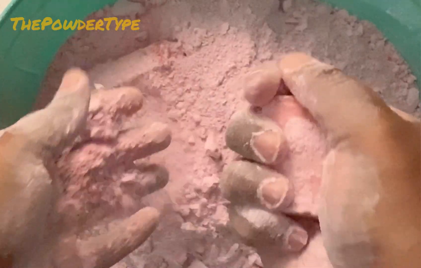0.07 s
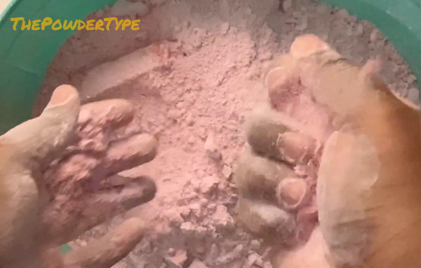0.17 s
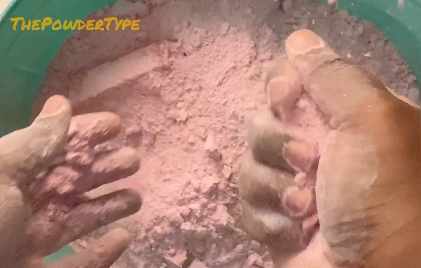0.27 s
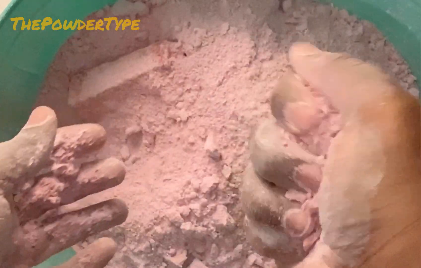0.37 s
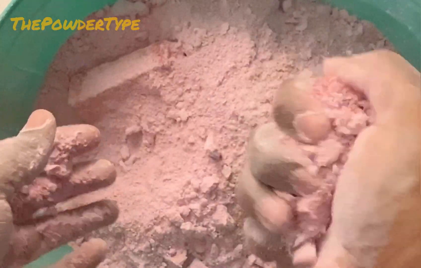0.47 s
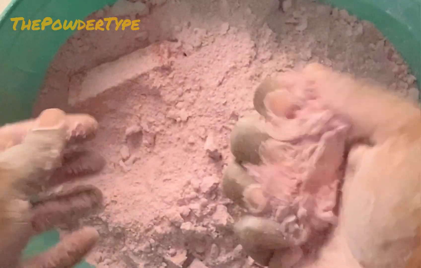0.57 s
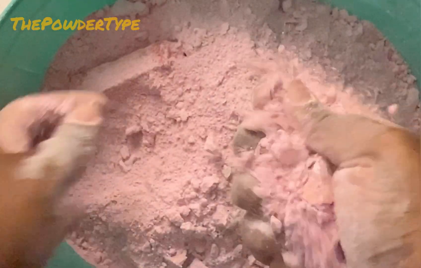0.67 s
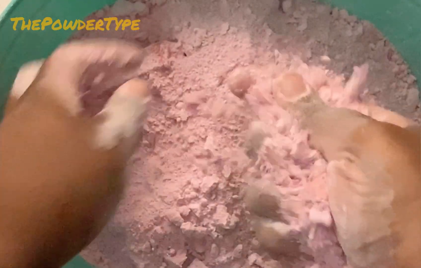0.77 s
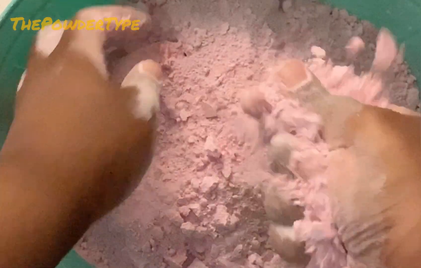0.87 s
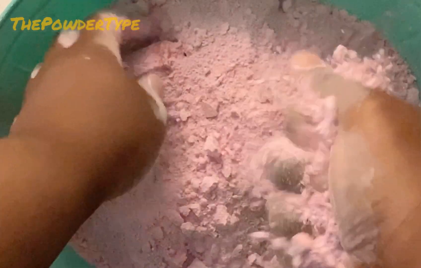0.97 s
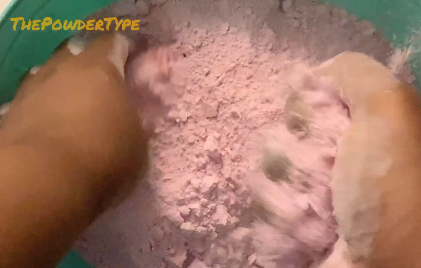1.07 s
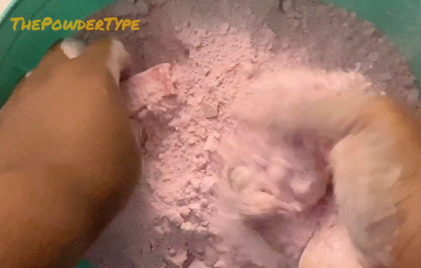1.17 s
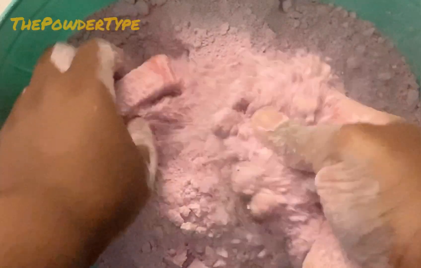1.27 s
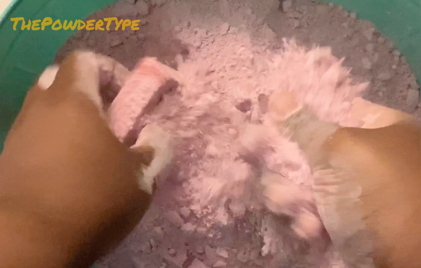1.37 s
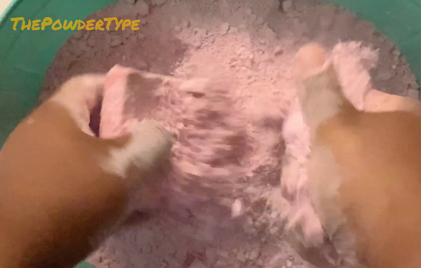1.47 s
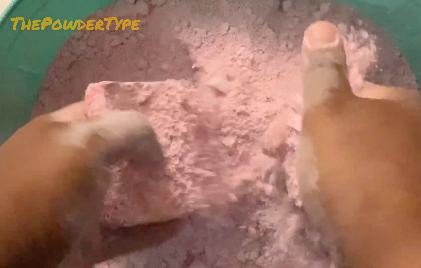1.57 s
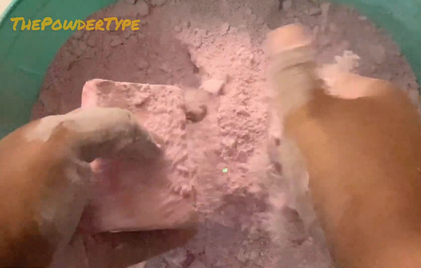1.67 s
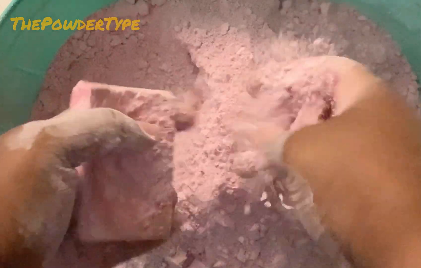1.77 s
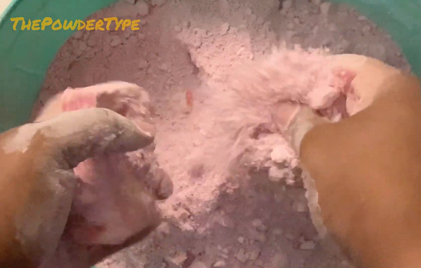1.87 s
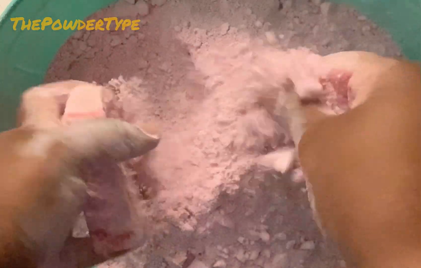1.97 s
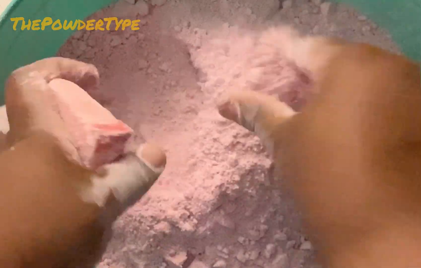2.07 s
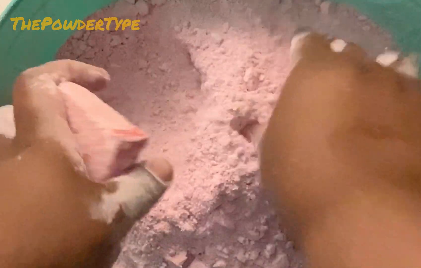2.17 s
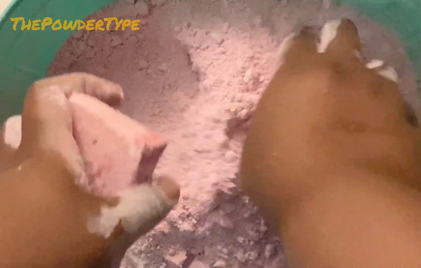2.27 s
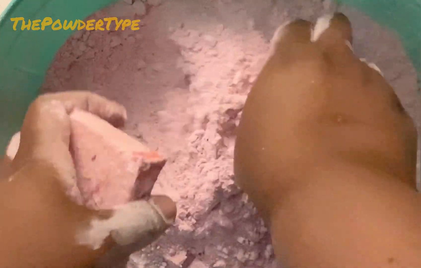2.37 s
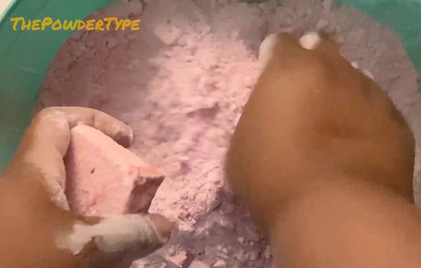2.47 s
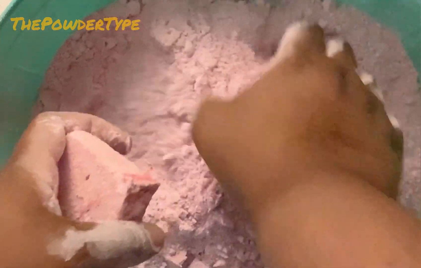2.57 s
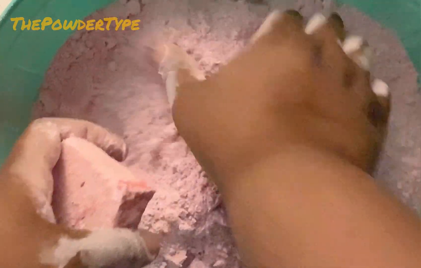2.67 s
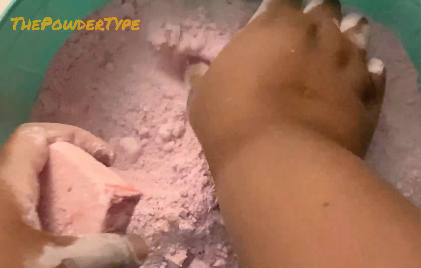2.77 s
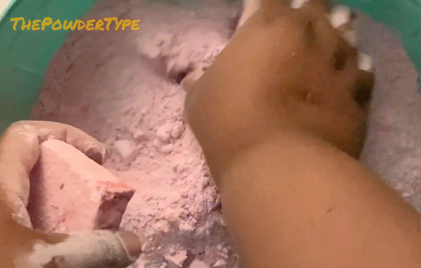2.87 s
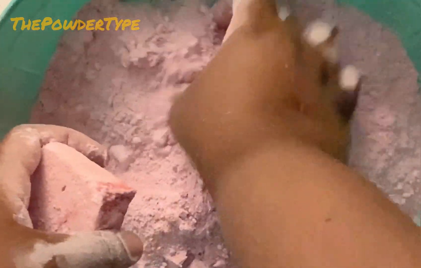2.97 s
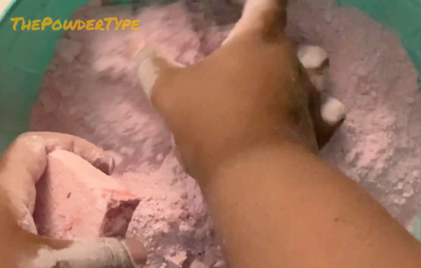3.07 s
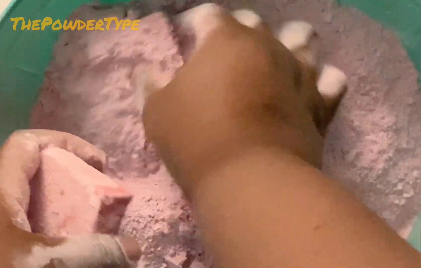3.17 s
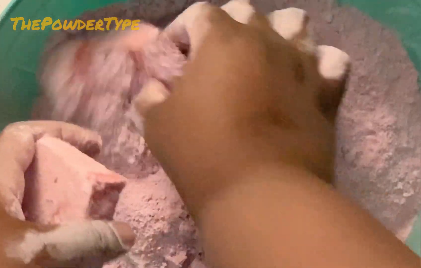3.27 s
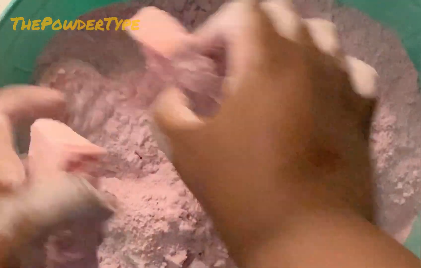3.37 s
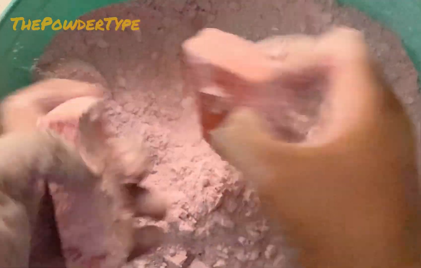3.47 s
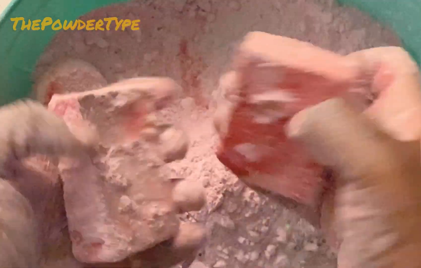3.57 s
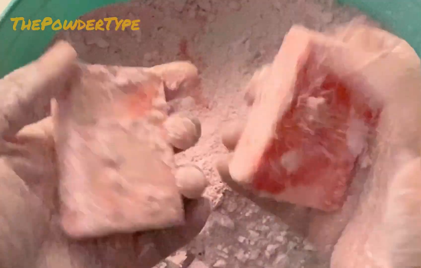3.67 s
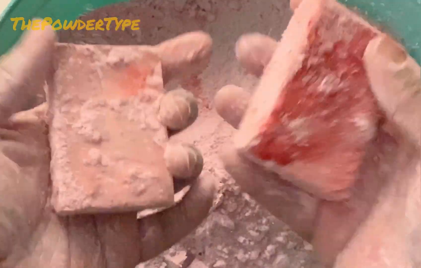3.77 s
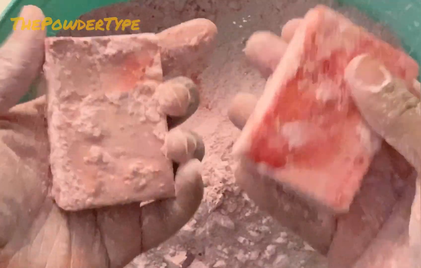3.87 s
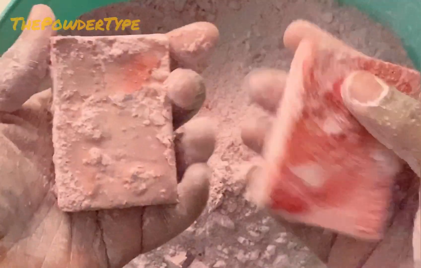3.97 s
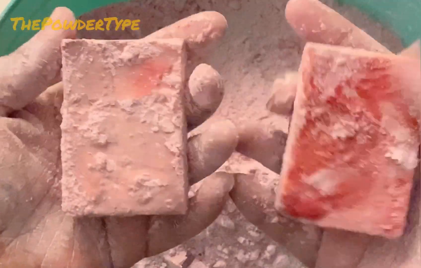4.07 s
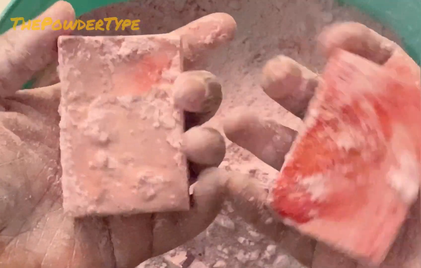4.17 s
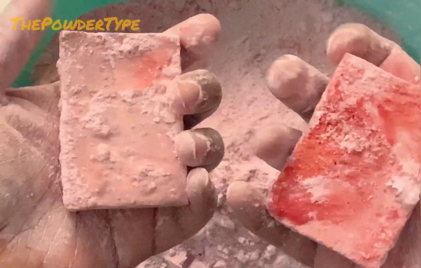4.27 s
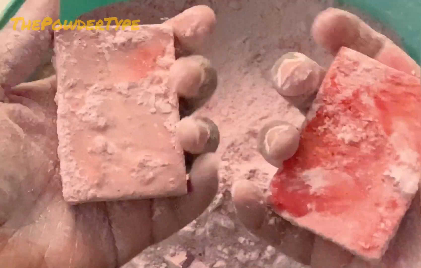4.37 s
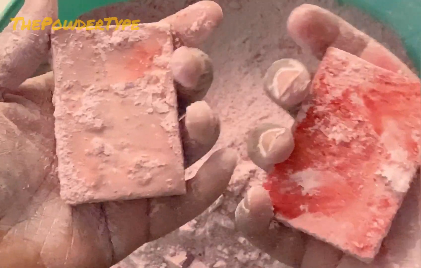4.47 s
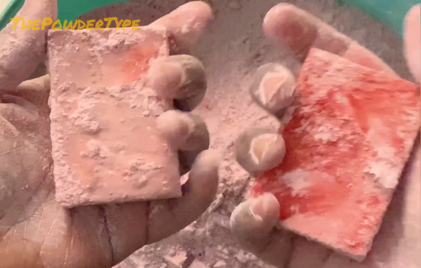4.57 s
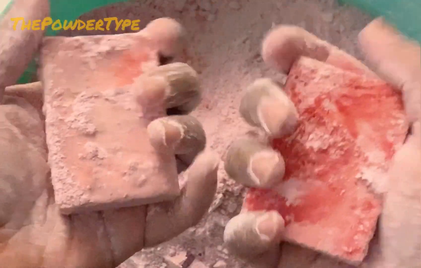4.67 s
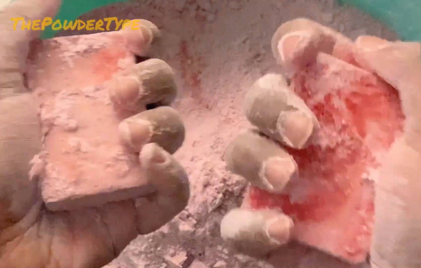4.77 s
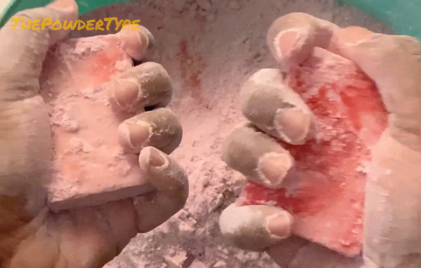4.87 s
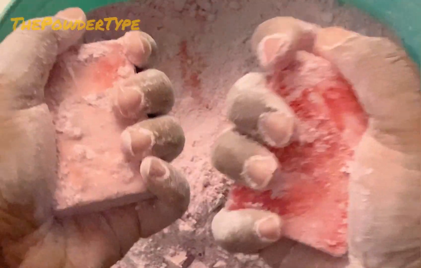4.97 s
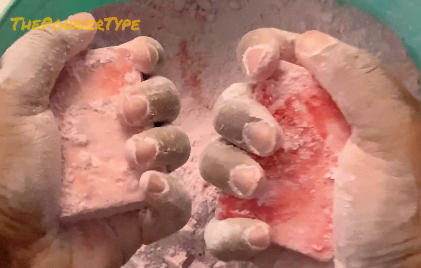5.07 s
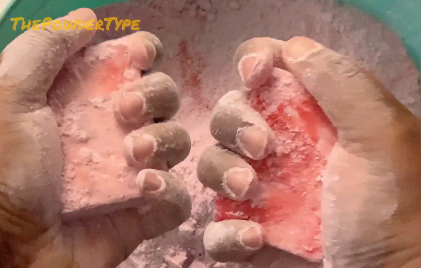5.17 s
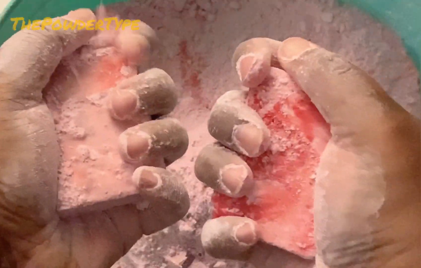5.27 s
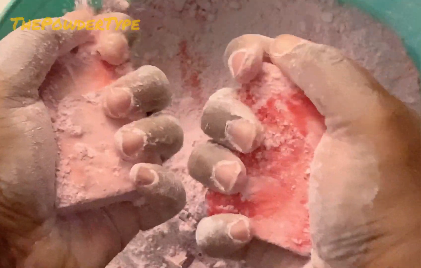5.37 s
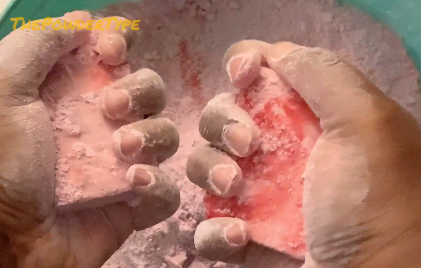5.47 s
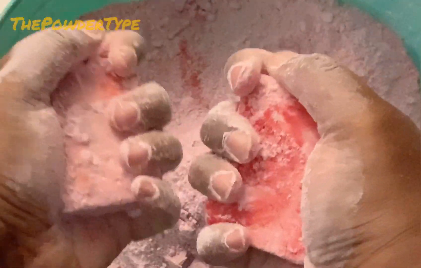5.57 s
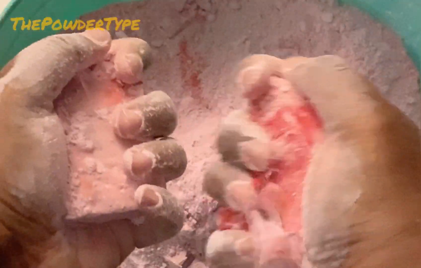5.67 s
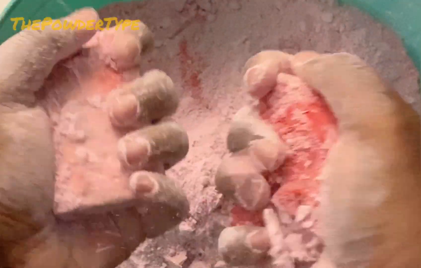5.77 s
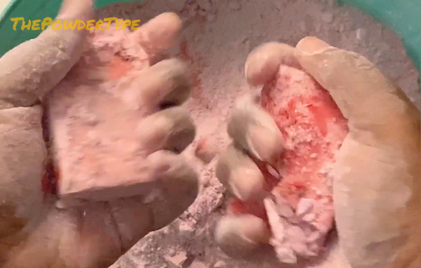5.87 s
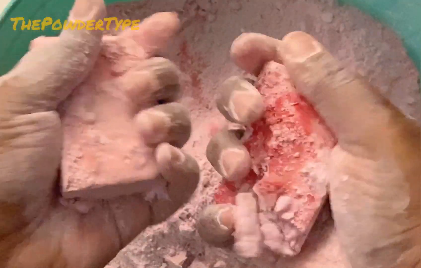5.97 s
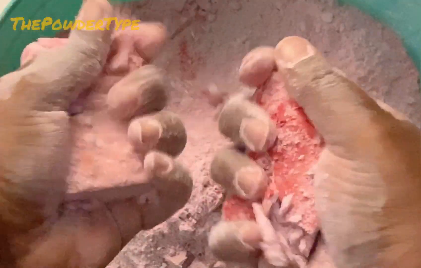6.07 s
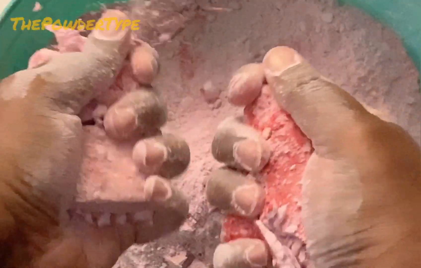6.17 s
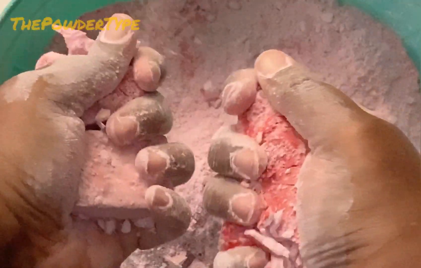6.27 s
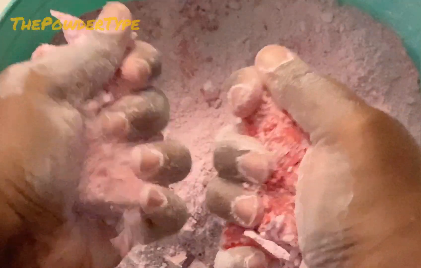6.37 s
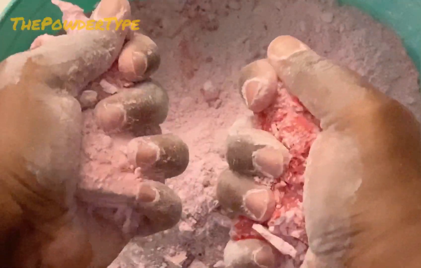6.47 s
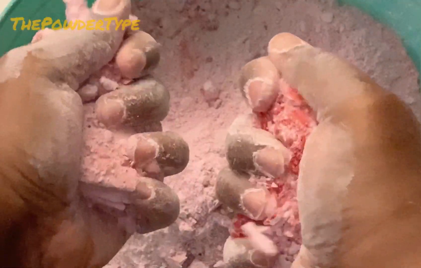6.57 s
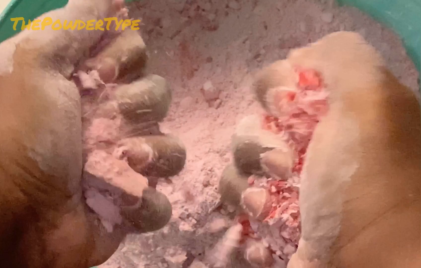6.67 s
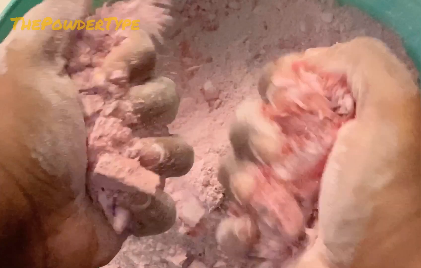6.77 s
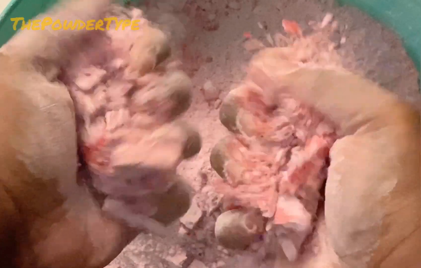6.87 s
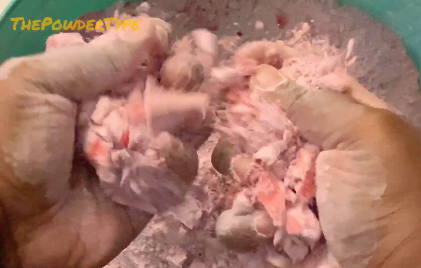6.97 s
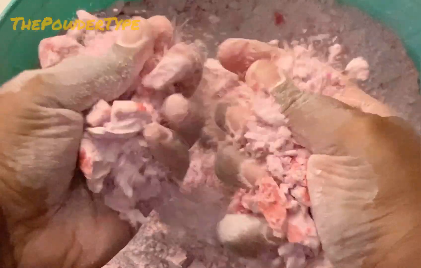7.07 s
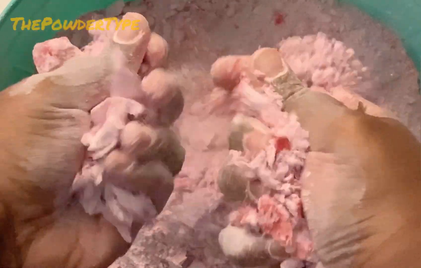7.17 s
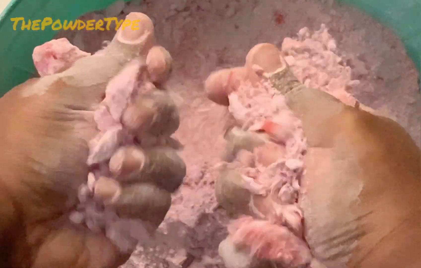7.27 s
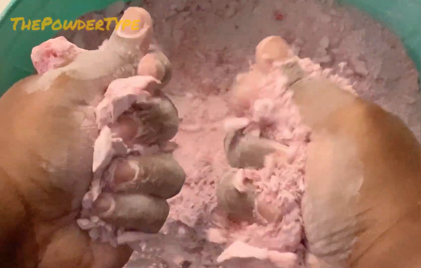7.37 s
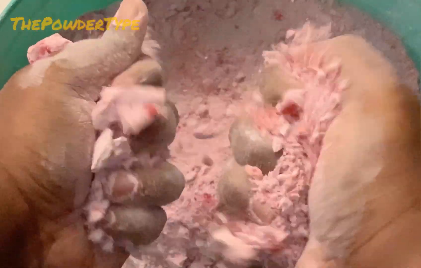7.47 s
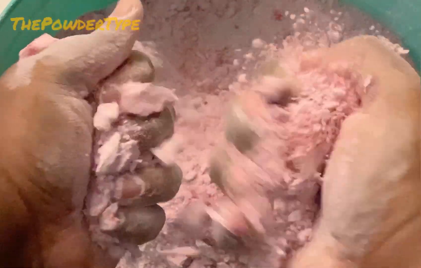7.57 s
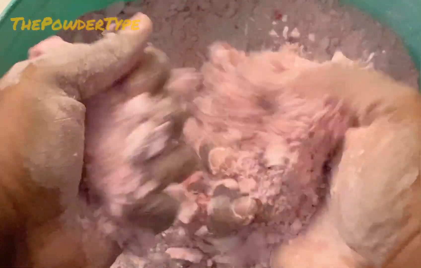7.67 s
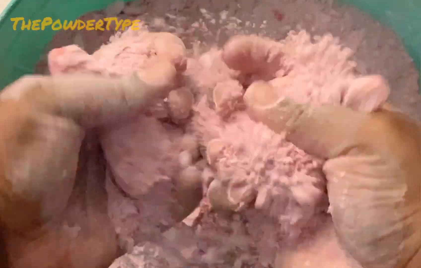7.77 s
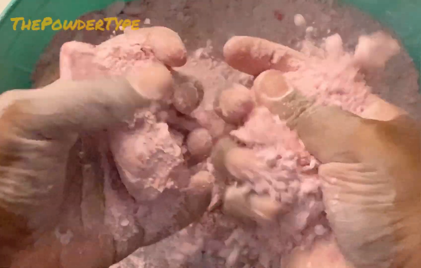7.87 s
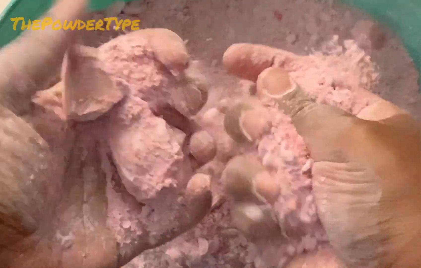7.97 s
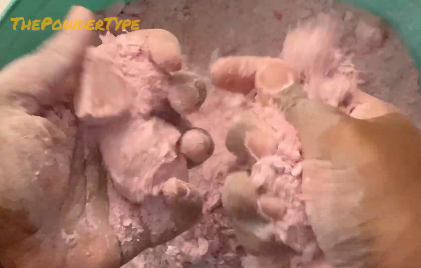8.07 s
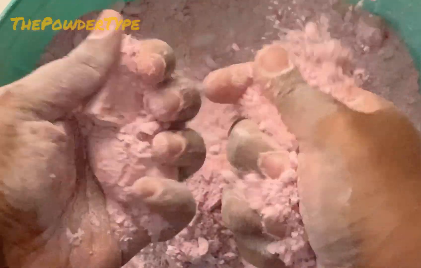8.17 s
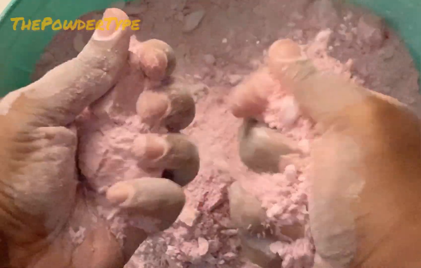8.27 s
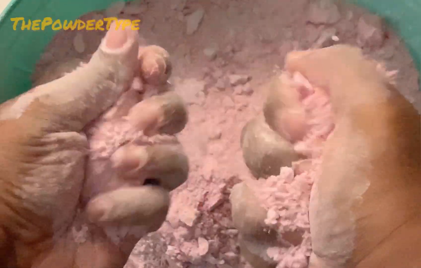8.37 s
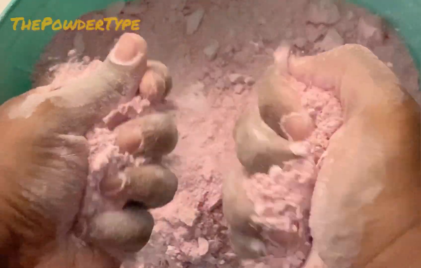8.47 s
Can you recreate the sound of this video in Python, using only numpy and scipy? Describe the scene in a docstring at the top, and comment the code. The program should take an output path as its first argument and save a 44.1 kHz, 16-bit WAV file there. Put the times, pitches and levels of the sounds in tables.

```python
"""In a room with a faint machine rumble and hum, two hands squeeze soft chalk over a plastic bowl of powder, close up.
Blocks snap as short kicks through damped resonances, with splinters, grit and a dull echo from the bowl.
Random grains filtered by colour make the grinding crumbs and dust, the spills and the streaming powder.
A hand digs with a muffled rumble; dry fingers slide over blocks with a grainy hiss and a wandering tone."""
import sys
import numpy as np
from scipy import signal
from scipy.fft import rfft, irfft, next_fast_len
from scipy.io import wavfile

SR = 44100
rng = np.random.default_rng(int(sys.argv[2]) if len(sys.argv) > 2 else 0)


def dump(signal):
    """Clip the signal to [-1, 1] and save it as 16-bit WAV at the path in sys.argv[1]."""
    limited = np.clip(np.atleast_2d(signal).T, -1, 1)
    pcm = np.round(limited * 32767).astype(np.int16)
    wavfile.write(sys.argv[1], SR, pcm)


N = 375280
TIME = np.arange(N) / SR


def from_db(db):
    """Decibels to gain."""
    return 10 ** (np.asarray(db) / 20)


def rms_one(x):
    """Scale to unit power."""
    return x / np.sqrt(np.mean(x ** 2) + 1e-20)


def gains(rows):
    """Each dB column of a curve as a gain per sample, practically silent outside its span."""
    s, *columns = np.transpose(rows)
    return np.array([from_db(np.interp(TIME, s, c, left=-120, right=-120)) for c in columns])


def around(s, reach_s):
    """The samples within reach of a moment."""
    return slice(max(int((s - reach_s) * SR), 0), int((s + reach_s) * SR))


def drift(rate_hz):
    """Smooth chance of unit power: noise through a two-pole low-pass."""
    step = 40  # samples between the slow values
    pole = np.exp(-2 * np.pi * step * rate_hz / SR)
    noise = rng.standard_normal(N // step + 2002)
    slow = signal.lfilter([1], [1, -2 * pole, pole * pole], noise)[2000:]
    return np.interp(np.arange(N) / step, np.arange(len(slow)), rms_one(slow))


def coloured(x, colour):
    """Causal (minimum-phase) filter with the given magnitude curve; unit power."""
    size = 2 * next_fast_len(N // 2 + SR // 10)
    hz, db = np.transpose(colour)
    log_hz = np.log(np.arange(size // 2 + 1) * SR / size + 1)
    curve_db = np.interp(log_hz, np.log(hz), db)
    # folding the cepstrum onto positive time makes the filter causal
    cepstrum = irfft(np.log(from_db(curve_db)))
    cepstrum[1:size // 2] *= 2
    cepstrum[size // 2 + 1:] = 0
    response = np.exp(rfft(cepstrum))
    return rms_one(irfft(rfft(x, size) * response, size)[:N])


def resonance(x, hz, q):
    """Band-pass of quality q, gain 1 on top."""
    w = 2 * np.pi * min(hz, SR / 2 - 1) / SR
    a = np.sin(w) / (2 * q)
    return signal.lfilter([a, 0, -a], [1 + a, -2 * np.cos(w), 1 - a], x + 1e-18)


def soften(x, hz):
    """Steep low-pass: soft chalk carries little above hz."""
    return signal.sosfilt(signal.butter(4, min(hz, .45 * SR), fs=SR, output="sos"), x)


def add(track, s, sound):
    """Mix a sound into the track at time s."""
    i = max(int(s * SR), 0)
    track[i:i + len(sound)] += sound[:max(N - i, 0)]


def grains(per_s, spread_db, low_hz, high_hz, q, wash=1.0, count=10):
    """Random fractures, many small and few large, ring briefly; noise stands for the countless finest."""
    sizes = from_db(spread_db * np.minimum(rng.exponential(1, N), 4)) * rng.choice([-1, 1], N)
    fractures = rms_one(sizes * (rng.random(N) < per_s / SR))
    clicks = fractures + wash * rng.standard_normal(N)
    # each sample is dealt to one of the resonances
    dealt = rng.integers(0, count, N)
    pitches = np.geomspace(low_hz, high_hz, count)
    return rms_one(sum(resonance(clicks * (dealt == k), hz, q) for k, hz in enumerate(pitches)))


# the clearest breaks, levels before trims:
# [t/s, level/dB, piece f/Hz, splinters re the snap/dB, bright grit/dB]
CLEAR_BREAKS = [(0.021, -44.5, 2180, -13, -49.5), (0.0745, -47.5, 2390, -8, -57),
                (0.102, -22.5, 618, -5, -50), (0.102, -30, 2610, -2, -43.5),
                (0.2475, -35, 1446, -1.5, -43.5), (0.3192, -40.5, 1600, -7, -50.5),
                (0.33, -35.5, 2930, -0.5, -35.5), (0.3321, -32.5, 2000, 5, -41.5),
                (0.3353, -30, 1215, 1.5, -44.5), (0.3428, -47.5, 2200, -8, -47.5),
                (0.3667, -38, 2105, 7.5, -39), (0.3821, -34.5, 1040, 1, -49.5),
                (0.6108, -45.5, 2200, -5.5, -57.5), (0.8255, -50, 1900, -8.5, -52),
                (0.8713, -41.5, 4030, -15.5, -40), (0.887, -35, 1590, -19.5, -59.5),
                (0.9395, -9, 1000, -2.5, -35), (0.9419, -24, 2390, -20, -61.5), (0.958, -41, 1280, 10, -29),
                (0.9672, -42, 1700, -11.5, -52.5), (1.0198, -31, 2420, -20.5, -40.5),
                (1.039, -30, 1660, 8, -44.5), (1.0412, -36.5, 2280, 14, -42.5),
                (1.062, -37.5, 2200, -3.5, -39.5), (1.0755, -40, 2510, -15, -44),
                (1.1263, -43.5, 2400, -4.5, -47), (1.154, -34.5, 2440, 3, -36),
                (1.174, -48.5, 1340, -12, -42), (1.2066, -34, 1336, 3, -36.5),
                (1.2172, -32, 857, -21, -36.5), (1.232, -28, 2540, -4, -30),
                (1.2746, -59.5, 1500, -12, -37.5), (1.2913, -48, 2200, -6, -55.5),
                (1.337, -38, 1820, 2.5, -63.5), (1.3818, -31, 1750, 2, -52), (1.498, -39, 1540, -4.5, -40),
                (1.56, -40.5, 2890, -14.5, -43.5), (1.5635, -43, 2660, -14, -41),
                (1.593, -40, 1430, -9, -54.5), (1.6033, -46.5, 2200, -9.5, -49.5),
                (1.6968, -45, 2370, 4, -45), (1.8353, -35, 1590, -12.5, -67.5),
                (2.0572, -28.5, 1892, 4, -41.5), (2.0729, -39.5, 1820, -4.5, -65),
                (2.1357, -48.5, 2600, -13.5, -54), (2.1727, -33.5, 980, 8, -64),
                (2.2054, -33.5, 2480, -17.5, -55), (2.241, -38.5, 2400, -12, -56),
                (2.2678, -37.5, 704, -7.5, -64.5), (2.303, -38.5, 630, 9, -70.5),
                (2.385, -28, 545, -7, -71), (2.446, -37.5, 2670, -22, -51.5),
                (2.488, -28.5, 806, -7.5, -68), (2.5364, -35, 1860, 5, -68),
                (2.5677, -36, 1236, 7.5, -76.5), (2.622, -37.5, 1870, -20, -73.5),
                (2.6386, -42.5, 1750, -2.5, -75), (2.6996, -48.5, 3200, -12.5, -47),
                (2.7332, -24, 1653, -2.5, -64), (2.733, -27.5, 3940, -15, -46.5),
                (2.7881, -44, 2000, -8, -55.5), (2.8969, -31.5, 2110, -8, -55),
                (2.8993, -26.5, 900, -3, -68), (2.9293, -41, 1800, -9, -62), (2.9773, -46, 2200, -7, -57),
                (3.0133, -44, 1710, -11, -65.5), (3.0906, -30, 818, -4, -71),
                (3.166, -50, 1150, -7.5, -47.5), (3.1742, -35.5, 710, 5.5, -57.5),
                (3.221, -36.5, 850, -7.5, -61.5), (3.2589, -43, 1340, 10.5, -59.5),
                (3.286, -44.5, 2300, -10, -59.5), (3.3079, -37, 1700, 3, -59),
                (3.3239, -34.5, 1600, 7, -64.5), (3.354, -42, 1830, -5.5, -56),
                (3.565, -55, 4120, -7, -57.5), (3.5718, -55, 1600, -3.5, -61),
                (3.5786, -54.5, 3360, -9.5, -57.5), (3.9588, -52.5, 1260, 8.5, -84),
                (4.0258, -53.5, 2170, -5, -66), (4.1324, -52.5, 2590, -8, -66),
                (5.0402, -50.5, 716, -17.5, -51.5), (5.09, -62, 897, -5, -73.5),
                (5.263, -52, 2235, -3, -58.5), (5.298, -50.5, 873, -4, -61.5), (5.3736, -49, 1370, -3, -48),
                (5.3871, -24, 1383, 3, -43.5), (5.3924, -35.5, 1580, 1.5, -50),
                (5.43, -48.5, 2000, -1, -46.5), (5.4321, -37.5, 1970, 9, -41),
                (5.444, -29, 1420, -6.5, -50.5), (5.4465, -23, 1000, -14.5, -53.5),
                (5.4522, -34.5, 1750, 10, -43), (5.4659, -39, 1460, 5, -48.5),
                (5.4701, -29, 1776, -1, -47.5), (5.651, -37.5, 835, 10.5, -48.5),
                (5.7742, -46, 800, -12.5, -75), (5.8092, -56, 3800, -8, -53), (5.8309, -49, 3200, -21, -37),
                (5.8441, -38.5, 1900, 6.5, -40), (5.963, -55, 2180, -3.5, -47),
                (6.0422, -44, 1190, -6, -67), (6.0503, -37.5, 812, -1.5, -66),
                (6.0554, -38.5, 1010, 12, -53), (6.097, -44.5, 1053, -6, -59.5),
                (6.1942, -46, 980, -4.5, -70), (6.218, -45, 1990, -16.5, -50.5),
                (6.228, -38.5, 816, -4.5, -64), (6.235, -37, 1414, 9.5, -40),
                (6.282, -37, 1430, -4.5, -49.5), (6.2887, -49, 3200, -5.5, -52),
                (6.308, -46.5, 1190, -9.5, -49.5), (6.342, -32.5, 736, -6, -69),
                (6.3501, -28.5, 902, 8.5, -36), (6.488, -7.5, 983, -17.5, -40),
                (6.493, -40, 2500, -26.5, -71.5), (6.5164, -22, 930, -23, -80),
                (6.6205, -31.5, 895, 7, -55), (6.6245, -15.5, 695, 2.5, -41),
                (6.6297, -22.5, 702, 2, -54.5), (6.6343, -23, 524, -26, -52), (6.675, -34.5, 520, 3, -66),
                (6.709, -38.5, 540, -7, -75), (6.7608, -31, 1870, 8, -46), (6.7683, -27, 2260, -5.5, -51),
                (6.7763, -31, 1400, 14.5, -40), (6.7928, -19.5, 1416, -14.5, -52),
                (6.795, -16, 1030, -16.5, -48.5), (6.8055, -17.5, 1750, 1.5, -39.5),
                (6.8223, -16, 1960, -7, -35), (6.8245, -23, 913, -22.5, -60.5), (6.867, -43, 2500, -7, -46),
                (6.877, -41.5, 1590, 10.5, -51.5), (6.8926, -41, 1510, 2, -43.5),
                (6.9088, -44, 1700, -6.5, -58.5), (6.9237, -44.5, 2470, -9, -53),
                (6.939, -51, 2600, -10, -49.5), (6.9942, -47, 1950, -7, -52), (7.0017, -47, 2000, -8, -57),
                (7.013, -43.5, 2600, -3, -48), (7.0572, -32, 1797, 4, -46), (7.0651, -42, 2510, -10, -52.5),
                (7.1072, -52, 2600, -10, -46.5), (7.0747, -39.5, 1900, -11, -52.5),
                (7.0869, -48, 1850, 15.5, -39.5), (7.1199, -40, 1260, -11.5, -48.5),
                (7.148, -31, 920, -3.5, -57), (7.1521, -30.5, 1766, -6, -47.5),
                (7.1656, -42, 2720, -10.5, -45), (7.168, -29.5, 575, -2, -54.5),
                (7.2461, -33.5, 750, -9, -50), (7.2582, -30.5, 890, -1.5, -59.5),
                (7.278, -46, 2000, -7.5, -56), (7.284, -43, 1050, -8.5, -59), (7.3033, -33, 760, 0.5, -60),
                (7.3199, -40.5, 2300, -3, -49.5), (7.3592, -48.5, 2200, -11.5, -57),
                (7.4056, -45, 1040, -1, -65.5), (7.4531, -42.5, 2210, -13, -53),
                (7.492, -39, 1670, 13, -35.5), (7.505, -33, 1173, 10.5, -62.5),
                (7.5268, -44.5, 2000, -10.5, -47.5), (7.5697, -39.5, 1750, -3.5, -44.5),
                (7.627, -33.5, 1187, 13, -43.5), (7.6398, -34, 1750, 6.5, -45),
                (7.6502, -36.5, 1610, -4.5, -46.5), (7.6861, -50, 2110, -9.5, -48),
                (7.7359, -38, 986, -7, -47), (7.7597, -30.5, 2530, 5.5, -35),
                (7.7648, -28.5, 621, -2.5, -55.5), (7.77, -31.5, 960, 10, -44),
                (7.8487, -40.5, 1310, -12, -60), (7.8687, -46, 2100, -11, -53), (7.8833, -35, 1750, 0, -49),
                (7.9139, -42, 1740, -5.5, -57.5), (7.937, -39.5, 2570, -12.5, -42),
                (7.9628, -37.5, 1400, -9.5, -42.5), (7.9702, -22.5, 1670, 11.5, -36.5),
                (7.9917, -10, 761, -6.5, -35.5), (7.998, -24, 2450, -27.5, -62),
                (8.0751, -30, 2710, -12, -35.5), (8.095, -41.5, 1670, -14, -48),
                (8.1272, -49.5, 2400, -9, -51), (8.163, -46, 1620, -9.5, -50.5),
                (8.206, -18.5, 1243, -1, -30.5), (8.2143, -32.5, 2020, -8.5, -54),
                (8.229, -27, 774, 4, -37.5), (8.254, -35.5, 2110, -6, -48.5), (8.289, -37, 500, 17, -61),
                (8.3183, -31.5, 810, 5.5, -52), (8.351, -35.5, 1003, 3, -53.5),
                (8.376, -32.5, 830, -3, -56), (8.4119, -39.5, 1020, -15.5, -71),
                (8.4302, -34, 973, -20, -56.5), (8.437, -38.5, 940, -10.5, -58),
                (8.4423, -52.5, 3170, -14, -41), (8.484, -43.5, 1094, -7, -39)]


def snaps(cracks):
    """A crack kicks a heavily damped piece; splinters and grit follow, and the bowl throws back a dull echo."""
    q = 0.987
    lead_s, echo_s, echo_db = .0006, 0.0015, -12
    body, grit = np.zeros(N), np.zeros(N)
    t = TIME[:SR // 20]
    impulse = 1.0 * (t == 0)
    attack = .003 * SR  # levels hold as if the energy filled 3 ms
    crumbling_s = 0.0019
    swell = t / crumbling_s * np.exp(1 - t / crumbling_s)
    for s, level_db, hz, after_db, bright_db in cracks:
        chips, sand = rng.standard_normal((2, len(t)))
        # three resonances in a row delay the full swing; high pieces ring for more cycles
        piece_q = q * (hz / 1000) ** 0.068
        kick = resonance(resonance(resonance(impulse, hz, piece_q), hz, piece_q), hz, piece_q)
        # a higher mode stands out in small cracks and grows less than the kick in big ones
        upper_hz = hz * 1.528
        upper = resonance(resonance(resonance(impulse, upper_hz, q), upper_hz, q), 2700, q)
        upper_db = -23.5 + 0.764 * level_db
        # the fracture itself is one abrupt, broad jolt
        edge = resonance(impulse, hz, 0.7)
        # a few splinters follow within milliseconds
        splinters = resonance(chips * np.abs(chips) * swell ** 2, hz, 0.7)
        splinters = resonance(splinters, hz * 0.4415, 0.7)
        parts = [(kick, level_db), (edge, level_db - 10), (upper, upper_db),
                 (splinters, level_db + after_db - 6.0)]
        mixed = sum(from_db(db) * part * np.sqrt(attack / np.sum(part ** 2)) for part, db in parts)
        # small cracks run faster and keep a crisper edge
        crack = soften(mixed, 1500 + 1.37 * hz - 45 * level_db)
        add(body, s - lead_s, crack)
        echo = from_db(echo_db) * resonance(crack, 1700, 0.778)
        add(body, s - lead_s + echo_s * rng.uniform(1.0, 1.22), echo)
        # grit: one tick, a dense burst and a thin tail
        spray = sand * (1.6 * np.exp(-t / 0.00057) + 0.13 * np.exp(-t / 0.0074))
        add(grit, s, from_db(bright_db + 5.5) * (4.0 * impulse + spray))
    grit = signal.sosfilt(signal.butter(2, 12000, fs=SR, output="sos"), grit)
    return body + 1.01 * resonance(grit, 5500, 1.0)


# spells of small pieces cracking: [start t/s, end t/s, rate/(1/s), level over the crumbs/dB, middle f/Hz]
CRACKLING_SPELLS = [(0.948, 1.65, 24.4, -7.5, 1700), (2.098, 3.365, 12.4, -8, 1700),
                    (5.414, 6.157, 12.5, -2, 1800), (6.842, 7.96, 34, -1, 1890),
                    (8.202, 8.506, 40.7, 0, 2030)]


def lesser_cracks(crumb_gain, dust_gain):
    """Small pieces give way at random, more often and louder under more effort; rows as in CLEAR_BREAKS."""
    grit_over_dust_db, splinters_db = 1.5, -31
    scatter_db, scatter_octaves = 0.5, 0.757  # each way
    rows = []
    chances = rng.random((len(CRACKLING_SPELLS), 200, 4))
    for (start_s, end_s, per_s, over_db, hz), draws in zip(CRACKLING_SPELLS, chances):
        # equal shares of the work done are equally likely to bring a crack
        work = np.cumsum(crumb_gain * (TIME > start_s) * (TIME < end_s))
        for when, *chance in draws[:int(per_s * (end_s - start_s))]:
            i = np.searchsorted(work, when * work[-1])
            size, pitch, grit = 2 * np.array(chance) - 1
            level_db = 20 * np.log10(crumb_gain[i]) + over_db + scatter_db * size
            bright_db = 20 * np.log10(dust_gain[i]) + grit_over_dust_db + scatter_db * grit
            rows.append((i / SR, level_db, hz * 2 ** (scatter_octaves * pitch), splinters_db, bright_db))
    return rows


# thin, high pings just after the hardest breaks: [t/s, level before the note levels/dB]
HARD_BREAK_PINGS = [(0.9436, -46.5), (6.49, -62.5), (7.9973, -42.5)]
# notes of a ping: [f/Hz, relative level/dB, decay/s]
PING_NOTES = [(3002, 28.5, 0.0019), (4920, 4, .008)]


def pings():
    """A thin, high ping of decaying sines just after the hardest breaks; its highest note lingers briefly."""
    out, t = np.zeros(N), TIME[:SR // 10]
    ring = sum(from_db(db) * np.sin(2 * np.pi * hz * t) * np.exp(-t / decay_s)
               for hz, db, decay_s in PING_NOTES)
    for s, level_db in HARD_BREAK_PINGS:
        add(out, s, from_db(level_db) * ring * (1 - np.exp(-t / .0003)))
    return out


# pockets of chalk collapsing at once: [middle t/s, level/dB, half length/s, bright grit/dB]
COLLAPSES = [(0.1058, -27.5, 0.00287, -40.5), (3.233, -49, 0.017, -66.5), (3.315, -45, 0.0053, -72),
             (3.341, -45, 0.0143, -63.5), (5.649, -35.5, 0.00576, -52), (5.858, -72.5, 0.012, -51.5),
             (6.058, -30, 0.00533, -44.5), (6.353, -31, 0.0019, -30.5), (6.634, -39, 0.0168, -50.5),
             (6.67, -71.5, 0.0133, -73), (6.785, -33.5, 0.0038, -44), (8.227, -30.5, 0.005, -54),
             (8.322, -42, 0.0062, -58.5), (8.373, -40, .006, -59.5), (8.482, -37.5, 0.0039, -54.5)]
# tone of the collapse: [f/Hz, relative level/dB]
COLLAPSE_COLOUR = [(150, 5), (500, 5), (1000, 9.5), (1700, 3), (3000, -0.5), (5000, -4.5), (9000, -24)]
# tone of the dust, here and in the grinding: [f/Hz, relative level/dB]
FINE_DUST_COLOUR = [(2500, 0), (5000, 5.5), (7500, -2.5), (10000, 1), (13000, 3.5), (16000, -4)]


def crunches():
    """A collapsing pocket: dense fractures and bright noise swell and die together."""
    coarse = coloured(grains(2500, 4.0, 200, 8000, .5, wash=.3), COLLAPSE_COLOUR)
    bright = coloured(rng.standard_normal(N), FINE_DUST_COLOUR)
    out = np.zeros(N)
    for s, level_db, half_s, bright_db in COLLAPSES:
        near = around(s, 5 * half_s)
        swell = 1 / np.cosh((TIME[near] - s) / half_s) ** 1.52
        out[near] += swell * (from_db(level_db) * coarse[near] + from_db(bright_db) * bright[near])
    return out


# loose pieces rubbing in the first fistful, under the digging hand, in the second fistful;
# each a curve before trims: [t/s, crumbs level/dB, dust level/dB]
RUBBING_PIECES = [
    [(0.0, -58, -75), (0.3, -62.5, -61.5), (0.82, -51.5, -73), (1.07, -46, -51), (1.35, -45.5, -62.5),
     (1.53, -49.5, -53), (1.87, -56.5, -73), (2.06, -56, -59), (2.24, -51, -51.5)],
    [(2.24, -48, -77.5), (2.344, -45.5, -67), (2.396, -43, -76), (2.524, -47, -70.5), (2.784, -48, -67.5),
     (2.956, -49.5, -68), (3.192, -55, -69), (3.33, -59.5, -60), (3.42, -66, -62)],
    [(6.83, -49.5, -57), (6.984, -49.5, -53.5), (7.422, -50, -59), (7.596, -51.5, -57.5), (7.82, -46, -55),
     (8.06, -48.5, -55.5), (8.18, -50.5, -61.5), (8.296, -51, -54.5), (8.38, -49, -62.5), (8.51, -50, -51)],
]
# the fingers tighten and let go: [tightest t/s, half length/s, crumbs level/dB, dust level/dB]
FINGER_SQUEEZES = [(0.01, 0.0444, -46, -60), (0.124, 0.0182, -49, -58), (0.357, 0.0704, -51, -65),
                   (0.596, 0.054, -43.5, -62.5), (0.828, 0.054, -42.5, -61), (0.996, 0.061, -44, -55),
                   (1.131, 0.056, -47.5, -71.5), (1.461, 0.065, -41.5, -60), (1.571, 0.014, -50.5, -52.5),
                   (1.633, 0.021, -49.5, -54), (1.709, 0.0066, -65.5, -52), (1.821, 0.0348, -43, -70),
                   (1.957, 0.0174, -42.5, -53.5), (2.205, .035, -41, -57.5), (2.293, 0.028, -43, -70.5),
                   (2.75, 0.029, -46, -63.5), (2.895, 0.047, -41.5, -62), (3.215, 0.036, -48.5, -61.5),
                   (3.288, .04, -44.5, -76.5), (5.279, 0.0334, -58, -64.5), (5.468, 0.031, -47.5, -60.5),
                   (5.675, .018, -54.5, -67.5), (5.835, 0.031, -58.5, -59), (5.973, .05, -53.5, -61),
                   (6.078, 0.028, -49, -59.5), (6.258, 0.062, -51.5, -65.5), (6.362, 0.0198, -47.5, -59),
                   (6.528, 0.071, -52, -68), (6.642, 0.063, -60, -65), (6.815, .04, -46, -48.5),
                   (7.14, .025, -41, -57.5), (7.296, .04, -44, -60.5), (7.437, .05, -48.5, -61.5),
                   (7.636, .025, -42, -54.5), (7.773, .04, -42, -56.5), (8.249, 0.044, -46, -58)]


def effort():
    """How hard crumbs and dust are ground: steady rubbing of loose pieces plus a swell for each squeeze."""
    trims_db = [[1.2635], [-3.5]]  # crumbs, dust
    steady = from_db(trims_db) * sum(gains(handful) for handful in RUBBING_PIECES)
    power = steady ** 2
    for s, half_s, crumbs_db, dust_db in FINGER_SQUEEZES:
        near = around(s, 5 * half_s)
        swell = 1 / np.cosh((TIME[near] - s) / half_s) ** 1.6
        power[:, near] += (from_db([[crumbs_db], [dust_db]]) * swell) ** 2
    return np.sqrt(power)


# tone of the crumbs: [f/Hz, relative level/dB]
COARSE_CRUMB_COLOUR = [(120, 8.5), (250, 4), (450, 1), (700, 4.5), (1000, 3.5), (1500, -3), (2200, -11.5),
                       (3500, -26), (7000, -36)]
# tone of the fine grains: [f/Hz, relative level/dB]
FINE_GRAIN_COLOUR = [(700, -7), (1500, -13.5), (2600, 6), (3500, 4), (5000, -2.5), (6300, -4),
                     (8000, -15.5), (15000, -50)]


def grinding(crumb_gain, dust_gain):
    """Crumbs, grains and dust give way together in small uneven slips."""
    crumb_db, grain_db, dust_db, slip_db = -1.0, -1.0, -2.0, 2.5
    # fine grains lie between crumbs and dust in level
    crumb_share = 0.349
    grain_gain = crumb_gain ** crumb_share * dust_gain ** (1 - crumb_share)
    slips = from_db(slip_db * drift(50))
    crumbs = coloured(grains(350, 3.7, 150, 4000, 1.8, wash=.75), COARSE_CRUMB_COLOUR)
    fine = coloured(grains(240, 3.8, 1000, 12000, .45, wash=.56), FINE_GRAIN_COLOUR)
    dust = coloured(grains(300, 3.5, 3000, 16000, .6, wash=1.2), FINE_DUST_COLOUR)
    mixed = from_db(crumb_db) * crumb_gain * crumbs
    mixed += from_db(grain_db) * grain_gain * fine
    mixed += from_db(dust_db) * dust_gain * dust
    return slips * mixed


# crumbs cascading after a break or a scoop, coarse low and fine high:
# [t/s, level before the envelope/dB, decay/s, f/Hz]
CRUMB_SPILLS = [(0.102, -31, 0.0072, 310), (0.109, -37.5, 0.0084, 1100), (2.272, -42, 0.085, 479),
                (2.376, -25, 0.0094, 624), (2.396, -30.5, 0.0198, 327), (2.487, -34.5, 0.0146, 800),
                (2.742, -49.5, 0.0125, 7250), (2.83, -46, 0.062, 850), (6.493, -40, 0.0107, 1150),
                (6.634, -37.5, 0.045, 590), (6.656, -48.5, 0.022, 1200), (8.204, -38, 0.0067, 12000)]


def spills():
    """A cascade of colliding crumbs starts within milliseconds and dies away."""
    q = 1.0
    out, t = np.zeros(N), TIME[:SR // 3]
    for s, level_db, decay_s, hz in CRUMB_SPILLS:
        sizes, chance = rng.standard_normal(len(t)), rng.random(len(t))
        hits = sizes * (.3 + (chance < 1200 / SR) * 3)  # about 1200 strong hits per second
        cascade = rms_one(resonance(resonance(hits, hz, q), hz, q))
        envelope = (1 - np.exp(-t / 0.0026)) * np.exp(-t / decay_s)
        add(out, s, from_db(level_db) * cascade * envelope)
    return out


# dull pushes of hand and lumps on the powder: [t/s, level before trim/dB, decay/s, f/Hz]
POWDER_PUSHES = [(0.102, -30, 0.0051, 198), (0.94, -22.5, 0.0168, 167.5), (1.087, -30.5, 0.128, 27.4),
                 (2.222, -22, 0.0263, 26.2), (2.266, -38, 0.064, 170), (2.39, -19, 0.0196, 41.9),
                 (2.487, -36, 0.0283, 129), (2.747, -32, 0.075, 42), (2.896, -37.5, 0.024, 96),
                 (6.3498, -13.5, 0.00342, 130.4), (6.491, -17.5, 0.00183, 174), (6.627, -26.5, 0.0338, 285),
                 (6.767, -27.5, 0.019, 198), (6.8, -31, 0.019, 183), (7.972, -32.5, 0.0334, 187),
                 (7.993, -18, 0.0087, 174), (7.78, -34, 0.044, 70.8), (8.204, -21, 0.025, 95)]


def thumps():
    """Flesh and packed powder give one soft shove, then a low, heavily damped puff."""
    out, t = np.zeros(N), TIME[:SR // 4]
    for s, level_db, decay_s, hz in POWDER_PUSHES:
        force = 30.7 * (t == 0) + rng.standard_normal(len(t)) * np.exp(-t / decay_s)
        push = resonance(resonance(force, hz, 0.9), hz, 0.83)
        add(out, s, from_db(level_db - 2.5) * push * np.sqrt(decay_s * SR / np.sum(push ** 2)))
    return out


# a hand digging through the powder, curve before trim: [t/s, level/dB]
DIGGING_LEVEL = [(2.12, -49.5), (2.212, -34), (2.358, -56), (2.39, -37), (2.658, -50), (2.74, -36.5),
                 (3.15, -48.5), (3.168, -37), (3.4, -57.5)]
# tone of the digging: [f/Hz, relative level/dB]
DIGGING_COLOUR = [(40, -13), (70, 10), (130, -1.5), (250, -5), (430, -18), (540, -17.5), (800, -9.5),
                  (1600, -14.5), (4000, -26), (6300, -29.5), (9000, -38.5)]


def digging():
    """A hand pushing through powder: a muffled rumble with a faint scratch, slipping unevenly."""
    slips = from_db(-4.5 + 2.5 * drift(28))
    rumble = coloured(grains(830, 2.4, 39, 5830, 0.59, wash=0.59), DIGGING_COLOUR)
    return slips * gains(DIGGING_LEVEL)[0] * rumble


# a dry finger slides over a block: [fastest t/s, half length/s, level before trim/dB, hand hollow f/Hz]
FINGER_STROKES = [(3.411, 0.032, -64.5, 5250), (3.529, 0.042, -58.5, 3600), (3.629, 0.0367, -55.5, 4000),
                  (3.735, 0.025, -65.5, 3330), (3.79, 0.014, -56, 3660), (3.83, 0.038, -67, 3250),
                  (3.91, 0.036, -62.5, 3800), (4.046, 0.0472, -58.5, 3140), (4.174, 0.037, -55, 3030),
                  (4.333, 0.096, -71, 3100), (4.66, 0.0306, -53, 3904), (4.809, 0.036, -71, 3800)]
# tone of skin on chalk: [f/Hz, relative level/dB]
SKIN_COLOUR = [(700, -4), (1250, -5), (1600, -5), (2600, -11.5), (3100, 0), (3500, -2), (4100, -2.5),
               (4900, -9), (6200, -1.5), (7600, -12.5), (10000, -10), (13000, -5), (16000, -12)]


def finger_slides():
    """Skin catching on chalk gives a grainy hiss, tuned by the shifting hollow under the hand."""
    hollow_db, wander_octaves = -7.0, 0.085
    steepness = 3.04  # 2 is a bell; more gives an even slide with quick ends
    hiss = coloured(grains(900, 3.0, 600, 16000, .5, wash=.9), SKIN_COLOUR)
    shift, catch = 2 ** (wander_octaves * drift(9)), drift(110)
    rub = np.zeros(N)
    for s, half_s, level_db, hz in FINGER_STROKES:
        near = around(s, 3 * half_s)
        speed = np.exp(-.5 * np.abs((TIME[near] - s) / half_s) ** steepness)
        tone = np.sin(2 * np.pi * hz * np.cumsum(shift[near]) / SR)
        hollow = rms_one(catch[near] * tone)
        rub[near] += from_db(level_db) * speed * (hiss[near] + from_db(hollow_db) * hollow)
    return from_db(-0.61 + 0.5 * drift(26)) * rub


# the finest powder streaming off the first fistful: [t/s, level/dB]
POWDER_STREAM = [(0.36, -71), (0.45, -66), (0.7, -65.5), (1.0, -71.5), (1.4, -56.5), (1.62, -59.5),
                 (1.75, -60.5), (1.96, -56.5), (2.08, -64), (2.23, -65), (2.26, -75.5)]
# tone of the stream: [f/Hz, relative level/dB]
POWDER_COLOUR = [(2000, -23), (3400, 11), (5000, -9), (6200, -4.5), (7600, -11), (10000, -7), (12500, 2.5),
                 (15500, -4)]


def streaming_powder():
    """Countless specks slide off the skin in a bright, even fizz."""
    fizz = coloured(grains(1500, 2.5, 2500, 16000, .6, wash=1.0), POWDER_COLOUR)
    return gains(POWDER_STREAM)[0] * fizz


# faint rings of the bowl: [f/Hz, level/dB, t60/s]
BOWL_RINGS = [(448, -63, 0.068), (1129.8, -49, 0.031), (1750, -60.5, 0.101)]


def bowl_and_room(x):
    """Faint rings of the bowl and a short, dull scatter from the room."""
    t60, wet_db, wall_hz = 0.058, -28, 700
    t = TIME[:SR // 3]
    scatter = resonance(resonance(rng.standard_normal(len(t)), wall_hz, .7), wall_hz, .7)
    scatter = scatter * from_db(-60 * t / t60) * (t > .004)
    response = from_db(wet_db) * scatter / np.sqrt(np.sum(scatter ** 2))
    for hz, db, ring_s in BOWL_RINGS:
        response = response + from_db(db - 60 * t / ring_s) * np.sin(2 * np.pi * hz * t)
    return signal.fftconvolve(x, response)[:N]


# machine hum: [f/Hz, middle level/dB]
MACHINE_HUM = [(29.7, -36.5), (131.9, -55.5), (263.8, -57.5)]
# tone of the room noise: [f/Hz, relative level/dB]
ROOM_NOISE_COLOUR = [(12, 5.5), (30, 0), (45, -2), (62, -8.5), (100, -15.5), (220, -23), (320, -30.5),
                     (650, -37.5), (1200, -47), (2500, -51), (8000, -57.5), (16000, -58.5)]


def room_tone():
    """A slightly wavering machine hum over low room noise."""
    waver_db, wander_rad, noise_db = 1.23, .3, -36.5
    hum = np.zeros(N)
    for hz, db in MACHINE_HUM:
        level = np.sqrt(2) * from_db(db + waver_db * drift(2.7))
        hum += level * np.sin(2 * np.pi * hz * TIME + wander_rad * drift(4.0))
    return hum + from_db(noise_db) * coloured(rng.standard_normal(N), ROOM_NOISE_COLOUR)


def scene():
    """The chalk and hands, the bowl and room answering them, and the room's own sound."""
    crumb_gain, dust_gain = effort()
    breaks = snaps(list(CLEAR_BREAKS) + lesser_cracks(crumb_gain, dust_gain)) + pings()
    pieces = crunches() + grinding(crumb_gain, dust_gain) + spills()
    touch = thumps() + digging() + finger_slides()
    chalk = breaks + pieces + touch + streaming_powder()
    return (chalk + bowl_and_room(chalk) + room_tone())[None]


def record(dry):
    """Peaks beyond full scale are clipped, then a steep low-pass cuts the top."""
    cutoff_hz = 16100
    low_pass = signal.ellip(10, .1, 80, cutoff_hz, fs=SR, output="sos")
    return signal.sosfilt(low_pass, np.clip(dry, -1, 1))


dry = scene()
out = record(dry)
dump(out)
```